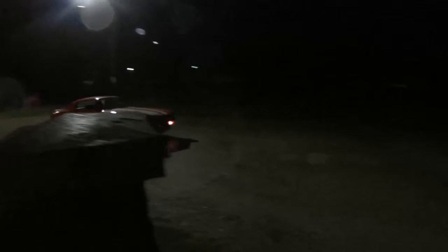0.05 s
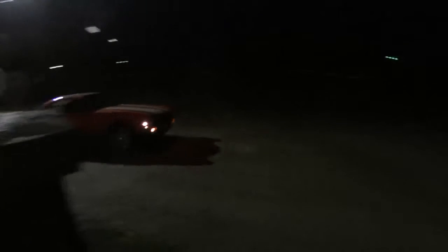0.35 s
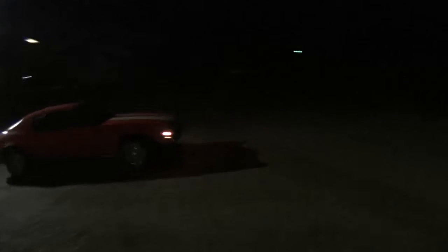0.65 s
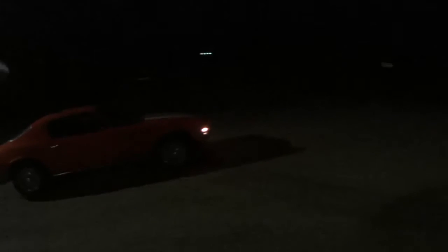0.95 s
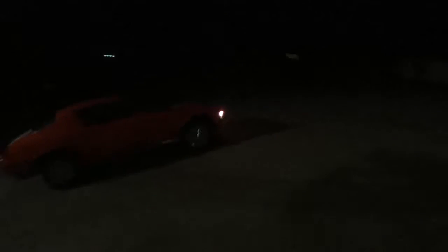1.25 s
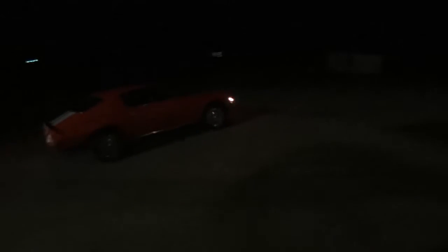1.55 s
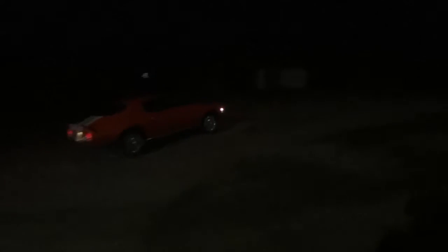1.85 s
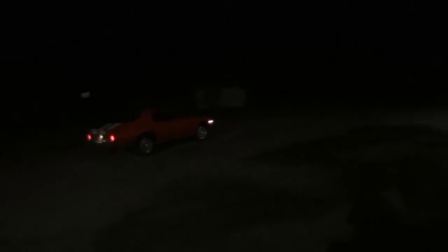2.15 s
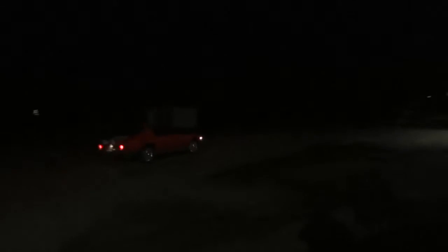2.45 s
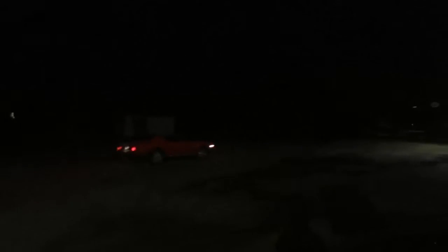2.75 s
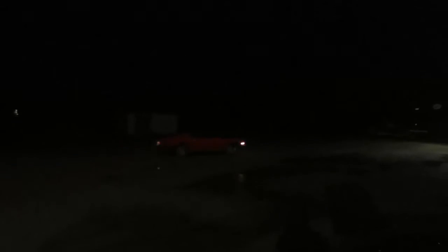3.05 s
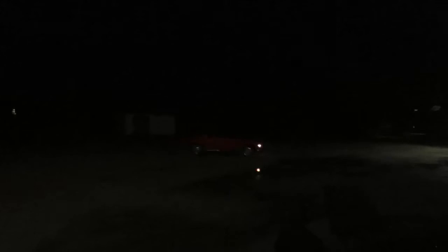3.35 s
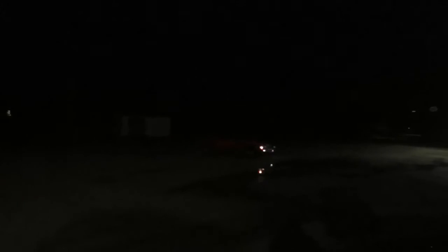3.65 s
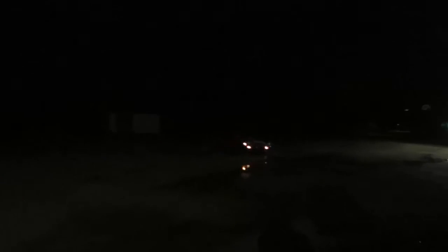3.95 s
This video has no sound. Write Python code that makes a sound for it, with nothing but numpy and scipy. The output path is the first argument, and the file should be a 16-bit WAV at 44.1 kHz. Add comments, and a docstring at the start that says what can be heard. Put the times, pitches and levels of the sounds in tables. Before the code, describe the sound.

A car rolls past on wet gravel, its tires hissing and crunching as stones ping and the engine burbles at low revs. It then slides through a puddle with a gurgling wash, heard close by outdoors.

```python
"""A hissing spray of grit and water comes off the tires of a V8 car rolling past at low revs on wet gravel.
Single stones ping and the tread crunches, among midrange plops and knocks. The car slides round through
a puddle, raising a gurgling wash and a ringing scrape, and moves off. The tire sounds are clouds of tiny
impacts; underneath, eight unequal cylinders puff into the exhaust pipe over a low rumble.
Heard in the open through two close microphone ports."""
import sys
import numpy as np
from scipy import signal
from scipy.fft import rfft, irfft
from scipy.io import wavfile
from scipy.ndimage import uniform_filter1d

SR = 44100
rng = np.random.default_rng(int(sys.argv[2]) if len(sys.argv) > 2 else 0)


def store_pcm(level_fs):
    """Save levels as 16-bit WAV."""
    pcm = np.round(np.clip(level_fs, -1, 1) * 32767).astype(np.int16)
    wavfile.write(sys.argv[1], SR, np.atleast_2d(pcm).T)


N = 176400
TIME = np.arange(N) / SR
BINS = np.maximum(np.arange(N // 2 + 1) * SR / N, 1)   # Hz


def from_db(db):
    """Decibels to gain."""
    return 10 ** (np.asarray(db) / 20)


def rms_one(x):
    """Scale to unit power."""
    return x / np.sqrt(np.mean(x ** 2) + 1e-20)


def in_time(rows):
    """Each column of an automation curve at every sample."""
    s, *columns = np.transpose(rows)
    return [np.interp(TIME, s, c) for c in columns]


def in_hz(rows):
    """Each column of an EQ curve at every frequency."""
    hz, *columns = np.transpose(rows)
    return [np.interp(np.log(BINS), np.log(hz), c) for c in columns]


def colour(x, eq):
    """Apply an EQ curve that rolls off below its first point; unit power."""
    low_cut = np.hypot(1, (eq[0][0] / 2 / BINS) ** 2)
    return rms_one(irfft(rfft(x) * from_db(in_hz(eq)[0]) / low_cut, N))


def butter(x, order, hz, kind="low"):
    """Flat-topped filter, low-pass by default."""
    return signal.sosfilt(signal.butter(order, hz, kind, fs=SR, output="sos"), x)


def drift(rate_hz):
    """Smooth random modulation with a spread of 1."""
    hop, settle = 40, 2000
    r = np.exp(-2 * np.pi * hop * rate_hz / SR)
    slow = signal.lfilter([1], [1, -2 * r, r * r], rng.standard_normal(N // hop + settle + 2))[settle:]
    return np.interp(np.arange(N) / hop, np.arange(len(slow)), rms_one(slow))


def resonance(x, hz, width_hz):
    """Two-pole resonance with gain 1 at its peak."""
    r = np.exp(-np.pi * width_hz / SR)
    poles = [1, -2 * r * np.cos(2 * np.pi * hz / SR), r * r]
    return signal.lfilter(np.array([1, 0, -1]) * (1 - r * r) / 2, poles, x + 1e-18)


def clicks(per_s, spread_db):
    """Random impacts of uneven size; unit power."""
    sizes = from_db(spread_db * np.minimum(rng.exponential(1, N), 4)) * rng.choice([-1, 1], N)
    return rms_one(sizes * (rng.random(N) < per_s / SR))


def patter(per_s, spread_db, surge_db, surge_hz):
    """Grains in 18 bands, per_s in each; the bands flicker singly and surge together."""
    edges_hz, out = np.geomspace(200, 12000, num=19), 0
    for low, high in zip(edges_hz, edges_hz[1:]):
        band = butter(clicks(per_s, spread_db), 2, [low, high], "band")
        out = out + band * from_db(.5 * drift(rate_hz=8.9))
    return rms_one(out) * from_db(surge_db * drift(surge_hz))


def moving_ring(drive, pitch, width_hz):
    """Impacts ring in one steep band whose centre follows a curve; level evened to unit power."""
    baseband = butter(drive * np.exp(2j * np.pi * rng.random(N)), 3, width_hz / 2)
    ring = np.real(baseband * np.exp(2j * np.pi * np.cumsum(in_time(pitch)[0]) / SR))
    return ring / np.sqrt(uniform_filter1d(ring ** 2, size=SR // 8) + 1e-12)


def bursts(hits, width, splash_db, rattle_db):
    """A strike and a dying rattle ring inside a broader splash; width is a share of the pitch."""
    out = np.zeros(N + SR)
    age = TIME[:SR // 4]
    for s, db, hz, t60 in hits:
        rattle, splash = rng.standard_normal((2, len(age))) * from_db(-60 * age / t60)
        drive = (age == 0) + from_db(rattle_db) * rattle / np.linalg.norm(rattle)
        ring = rms_one(resonance(resonance(drive, hz, hz * width), hz, hz * width * 4))
        hit = ring + from_db(splash_db) * rms_one(butter(splash, 3, [.8 * hz, 1.6 * hz], "band"))
        out[int(s * SR):int(s * SR) + len(age)] += from_db(db) * hit / np.abs(hit).max()
    return out[:N]


def rumble():
    """A steady bed of low noise."""
    # rumble colour: (frequency [Hz], gain [dB])
    eq = [(45, -12), (100, -3), (160, -2.5), (225, -2), (320, -13), (900, -28.5)]
    return from_db(-46) * colour(rng.standard_normal(N), eq)


def exhaust_puffs(firings):
    """Eight unequal cylinders puff in turn into the pipe; unit power."""
    # strength of each cylinder in firing order: (level [dB])
    cylinder_db = [2.5, -6, 1.5, 1, -17, 1.5, 3, -4.5]
    # exhaust pipe colour: (frequency [Hz], gain [dB])
    pipe_eq = [(35, -11), (55, 1), (90, -11), (125, -2), (150, -4), (185, -17), (225, -3.5), (257, 10.5),
               (295, -17), (370, -11), (420, -17.5), (500, -3), (600, -30), (1000, -5)]
    jitter_s, scatter_db = .00015, 2.5
    fired = np.flatnonzero(np.diff(np.floor(firings)))
    timing, strength = rng.standard_normal((500, 2))[:len(fired)].T
    at = np.clip(fired + (jitter_s * SR * timing).astype(int), 0, N - 1)
    puffs = np.zeros(N)
    puffs[at] = from_db(np.resize(cylinder_db, len(fired)) + scatter_db * strength)
    puffs[at] -= .71 * puffs[at].mean()   # the two tailpipes cancel most of the even pulse
    return colour(butter(puffs, 2, 900), pipe_eq)


def pipe_boost(hz, note_hz=253, width_hz=9, peak_db=7):
    """Decibels gained by a tone as it passes the exhaust pipe's note or its octave."""
    return peak_db * sum(np.exp(-((hz / k - note_hz) / width_hz) ** 2) for k in (1, 2))


def engine():
    """The V8 burbles: exhaust puffs, with clean tones on multiples of the eight-cylinder cycle."""
    # engine speed: (time [s], firing rate [Hz])
    revs = [(0, 78), (.65, 78), (.95, 81), (1.2, 85.5), (1.5, 92.5), (1.75, 92), (1.9, 93.5), (2.15, 92),
            (2.35, 88), (2.8, 81)]
    # exhaust fader: (time [s], level [dB])
    exhaust_level = [(0, -46), (.8, -45), (1.2, -37), (1.9, -34), (2.2, -35.5), (2.5, -51), (4, -48.5)]
    # clean tones over the puffs: (multiple of the cycle, level ahead of the fader [dB])
    orders = [(11, -18.5), (19, -14.5), (20, -11.5), (21, -16), (22, -18), (23, -21), (24, -22.5),
              (32, -20.5), (42, -22.5), (44, -27.5)]
    # low tones at 5, 8 and 13 times the cycle: (time [s], level [dB], level [dB], level [dB])
    low_levels = [(0, -64, -56, -51), (.5, -58, -53, -49.5), (.9, -51, -46.5, -50), (1.25, -48, -43.5, -49),
                  (1.6, -43, -48, -45), (1.85, -44.5, -57, -43.5), (2.15, -51, -60, -51),
                  (2.5, -63, -64, -68), (4, -68, -76, -73)]
    wobble, flutter_db = .0015, 2.8
    firing_hz = in_time(revs)[0]
    firings = np.cumsum(firing_hz * (1 + wobble * drift(rate_hz=5.4))) / SR
    cycle = 2 * np.pi * firings / 8
    exhaust = from_db(-6) * exhaust_puffs(firings)
    for order, db in orders:
        gain = from_db(db + pipe_boost(order * firing_hz / 8) + flutter_db * drift(rate_hz=1.3))
        exhaust += np.sqrt(2) * gain * np.sin(order * cycle + 2 * np.pi * rng.random())
    low_tones = sum(from_db(db) * np.sin(k * cycle) for k, db in zip((5, 8, 13), in_time(low_levels)))
    return from_db(in_time(exhaust_level)[0]) * exhaust + np.sqrt(2) * low_tones


def gurgle():
    """Churned water stutters in one narrow band whose centre slowly moves."""
    # gurgle fader: (time [s], level [dB])
    level = [(0, -52.5), (.9, -46), (1.1, -31), (1.25, -40), (2.0, -40), (2.15, -30.5), (2.18, -41),
             (2.47, -40), (2.68, -28), (2.95, -24), (3.2, -29.5), (4, -31.5)]
    # band centre, rising, then sinking as the water deepens: (time [s], pitch [Hz])
    pitch = [(1.1, 1150), (2.0, 1310), (2.4, 1303), (2.65, 1208), (3.0, 1124)]
    churn = moving_ring(clicks(per_s=500, spread_db=1), pitch, width_hz=224)
    stutter_db = 1.5 * drift(rate_hz=36)
    return from_db(in_time(level)[0] + stutter_db) * churn


def skid_ring():
    """Grit keeps one high, wandering resonance ringing; it is broad while the tires scrape hardest."""
    # centre of the resonance: (time [s], pitch [Hz])
    pitch = [(.5, 2640), (2.0, 2850), (2.65, 2709), (3.269, 2836), (3.55, 2760)]
    # narrow ring in the hiss: (time [s], level [dB])
    ring_level = [(0, -53), (.6, -30.5), (2.42, -31.5), (3.2, -29), (3.275, -27), (3.33, -29.5), (3.7, -30),
                  (4, -26)]
    # broad scrape, swelling as the slide begins: (time [s], level [dB])
    scrape_level = [(2.35, -38), (2.58, -25), (3.0, -29), (3.3, -42)]
    ring = moving_ring(clicks(per_s=1300, spread_db=1), pitch, width_hz=200)
    scrape = moving_ring(clicks(per_s=1300, spread_db=1), pitch, width_hz=600)
    return from_db(in_time(ring_level)[0]) * ring + from_db(in_time(scrape_level)[0]) * scrape


def crunches():
    """The tread bites in and crushes gravel in sudden broad bursts."""
    # bites: (time [s], starting rms level [dB], t60 [s])
    bites = [(0.488, -35, 0.12), (0.662, -28, 0.087), (1.839, -23, 0.096), (2.383, -20.5, 0.11)]
    # crushed gravel colour: (frequency [Hz], gain [dB])
    eq = [(350, -12), (650, -8), (1100, 3.5), (1900, -3), (2600, 9), (5000, 6), (10000, -27)]
    envelope = sum(from_db(db - 60 * np.maximum(TIME - s, 0) / t60) * (TIME >= s) for s, db, t60 in bites)
    return envelope * colour(clicks(per_s=3600, spread_db=5.5), eq)


def plops():
    """Midrange plops and knocks, with a stone tick and a low thump as the slide begins."""
    # hits: (time [s], peak level [dB], pitch [Hz], t60 [s])
    hits = [(1.09, -19.5, 1105, 0.16), (1.502, -14, 970, 0.06), (1.521, -21, 1230, 0.072),
            (1.671, -20.5, 1085, 0.13), (1.84, -23, 1010, 0.42), (2.328, -16, 1250, 0.13),
            (2.394, -22.5, 1340, 0.055), (2.548, -29, 700, .2), (2.94, -21, 1150, 0.094),
            (3.322, -16, 1084, 0.055), (3.857, -17, 1173, .07)]
    return bursts(hits, width=.087, splash_db=-9.5, rattle_db=7)


def pings():
    """Flung stones strike with a tight, bright ring."""
    # strikes: (time [s], peak level [dB], pitch [Hz], t60 [s])
    stones = [(.484, -17.5, 2550, 0.087), (.597, -5.5, 4940, 0.081), (.621, -12, 4950, 0.058),
              (.685, -14, 3190, 0.09), (.862, -12.5, 2790, 0.14), (.953, -12, 5230, .06),
              (2.105, -10, 3830, 0.048), (2.14, -13, 5300, 0.11), (2.334, -15.5, 2650, 0.025),
              (3.607, -14, 2730, .05)]
    return bursts(stones, width=.029, splash_db=-10, rattle_db=-1.5)


def clinks():
    """Small stones knock together at random, each ringing briefly at its own pitch."""
    pitches_hz = np.geomspace(2000, 10000, num=60) * np.exp(.012 * rng.standard_normal(60))
    out = 0
    for hz in pitches_hz:
        knocks = np.zeros(N)
        knocks[rng.integers(0, N, size=24)] = from_db(rng.uniform(-12, 0, size=24))
        out = out + resonance(knocks, hz, width_hz=70)
    return rms_one(out)


def wash():
    """Coarse, duller splatter as the tires plough sideways."""
    # wash fader: (time [s], level [dB])
    level = [(0, -63), (1.8, -34), (2.3, -34.5), (2.52, -32), (2.555, -22.5), (2.95, -20.5), (3.2, -21),
             (3.45, -23), (3.8, -25.5), (3.88, -22), (4, -28)]
    # splatter colour: (frequency [Hz], gain [dB])
    eq = [(170, -43), (220, -9.5), (290, -23.5), (390, -18), (700, -13), (850, -20), (1000, -9.5),
          (1200, -1.5), (1420, -15), (1640, -4), (1830, -13.5), (2230, -9.5), (2450, -4), (2980, -5),
          (3200, -3), (3500, -8), (3900, -8.5), (4400, -11), (5100, -10), (5800, -14.5), (7600, -15),
          (10800, -26.5)]
    splatter = patter(per_s=2700, spread_db=2, surge_db=.6, surge_hz=17)
    cracks = from_db(-8) * clicks(per_s=480, spread_db=2)
    return from_db(in_time(level)[0]) * colour(splatter + cracks + from_db(-9) * clinks(), eq)


def spray():
    """Fine grit and droplets hiss off the rolling tread, with cracks and clinks of gravel."""
    # spray fader: (time [s], level [dB])
    level = [(0, -34), (.33, -29.5), (.475, -25), (.49, -21), (.57, -22), (.645, -22.5), (.67, -20),
             (.95, -18.5), (2.16, -19.5), (2.32, -26.5), (2.45, -26.5), (2.54, -20), (2.62, -23),
             (2.78, -24), (2.85, -29.5), (3.3, -32), (3.8, -32), (3.87, -27.5), (4, -23)]
    # hiss colour: (frequency [Hz], gain [dB])
    eq = [(210, -32), (360, -20), (404, -29), (494, -25.5), (639, -34), (920, -16), (1410, -15.5),
          (1580, -7.5), (1800, -16), (2260, -10), (2610, -1), (2800, -1.5), (3280, -4.5), (3900, -5),
          (4190, -8.5), (4700, -2), (5150, -1), (6100, -8.5), (8580, -11), (10800, -23.5)]
    grit = patter(per_s=6000, spread_db=1, surge_db=.9, surge_hz=12.7)
    cracks = from_db(-2.5) * clicks(per_s=1500, spread_db=2)
    return from_db(in_time(level)[0]) * colour(grit + cracks + from_db(-9) * clinks(), eq)


def ports(x, scatter_t60_s=.2):
    """Direct sound with each port's gain and phase, plus a short diffuse scatter from the ground."""
    # stereo image: (frequency [Hz], left minus right [dB], left phase lead [rad])
    image = [(100, -0.9, 0.2), (400, -3.5, 0.13), (625, -15, .3), (770, -9.5, 2), (1150, -7.5, 1.23),
             (1640, -5, 0.91), (1960, 4, 1), (2340, -3.5, 1.13), (2790, 8, 1.25), (2830, 6, .7),
             (3100, 2, 0.48), (4000, -0.5, 0.45), (5700, -0.5, 0.4), (6600, -2, 0.93), (7540, 4, 1.03),
             (11300, -1, .15)]
    # ground scatter, opposite in polarity at the two ports: (frequency [Hz], level re direct [dB])
    scatter_eq = [(100, -16.5), (650, -7), (1100, -14), (2600, -18), (5000, -13.5), (9000, -17.5)]
    balance_db, lead = in_hz(image)
    direct = from_db(np.outer([.5, -.5], balance_db)) * np.exp(1j * np.outer([.5, -.5], lead))
    direct /= np.abs(direct.mean(axis=0))   # keeps the mono mix flat
    age = TIME[:SR // 8]
    tail = rng.standard_normal(len(age)) * from_db(-60 * age / scatter_t60_s)
    scatter = rfft(tail / np.linalg.norm(tail), N) * from_db(in_hz(scatter_eq)[0])
    return irfft(rfft(x) * (direct + np.outer([1, -1], scatter)), N)


def scene():
    """Tires, water, stones and engine over a low rumble, spread to stereo."""
    impacts = plops() + pings()
    bed = rumble()
    tires = spray() + wash() + gurgle() + skid_ring() + crunches()
    return ports(tires + impacts + engine() + bed)


def record(dry, cutoff_hz=10850):
    """A steep low-pass takes off the top."""
    return signal.sosfilt(signal.ellip(12, .1, 80, cutoff_hz, fs=SR, output="sos"), dry)


dry = scene()
out = record(dry)
store_pcm(out)
```